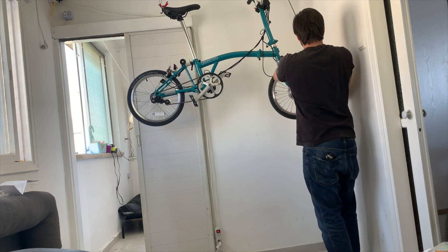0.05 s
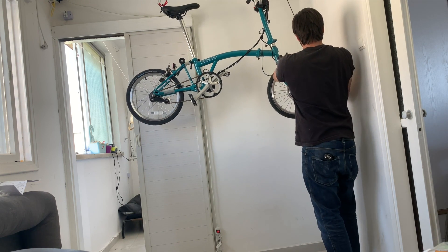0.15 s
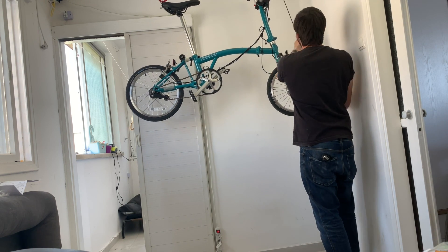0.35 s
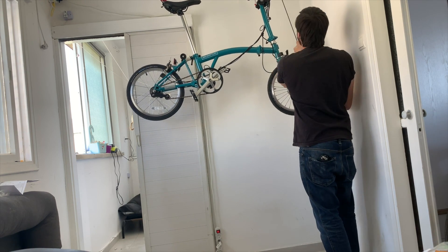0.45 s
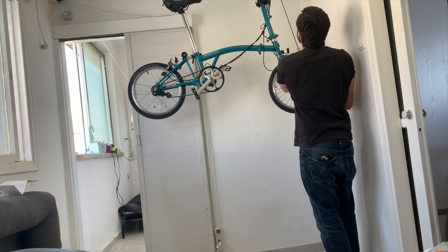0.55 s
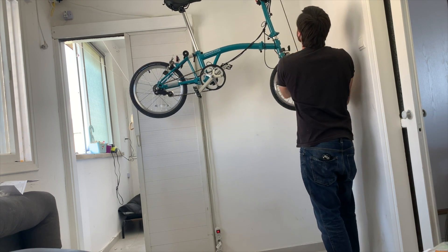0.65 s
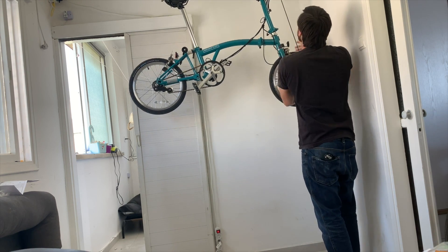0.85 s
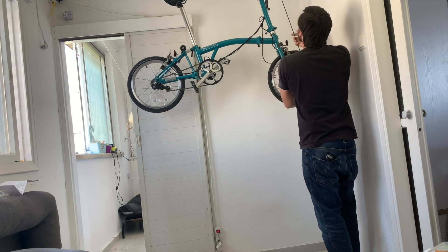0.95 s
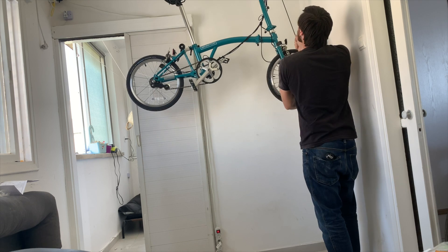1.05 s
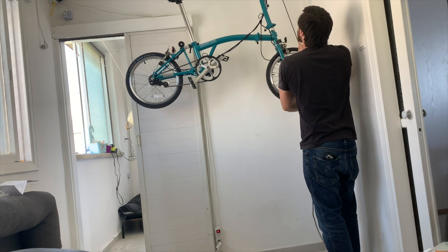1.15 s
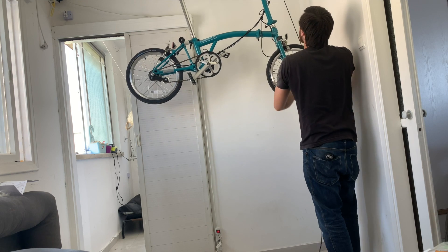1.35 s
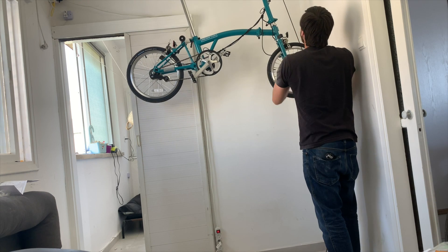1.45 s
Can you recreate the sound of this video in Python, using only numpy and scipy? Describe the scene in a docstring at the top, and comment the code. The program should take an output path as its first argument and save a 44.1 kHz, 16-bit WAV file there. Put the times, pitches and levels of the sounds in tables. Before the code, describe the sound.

A rope rustles and hisses faintly through hoist pulleys throughout, a few metres away, with small rasps and a thin pulley whine. At about 0.55 seconds the hanging bicycle gives a dull bump, then a sharp, dry click. Small metal parts tick from 0.6 to 1.4 seconds as the rustle grows slightly, with one brief squeak near 1 second. Low rumble and hum underlie the quiet room.

```python
"""A quiet room, heard in mono a few metres from a rope hoist that eases a bicycle along.
Rope fibres rustle and hiss through hands and pulleys, rasping where they catch and squeaking once.
Small metal parts tick and the sheaves sing faintly. The load gives a dull bump and a sharp click.
Underneath lie a deep rumble, a low hum and soft room air."""
import sys
import numpy as np
from scipy import signal
from scipy.fft import rfft, irfft
from scipy.io import wavfile
from scipy.ndimage import uniform_filter1d

SR = 44100
rng = np.random.default_rng(int(sys.argv[2]) if len(sys.argv) > 2 else 0)


def output_pcm(signal):
    """Save a mono or channel-first signal as 16-bit PCM at the path in sys.argv[1].

    Samples are clipped to [-1, 1] before scaling.
    """
    pcm = np.clip(np.atleast_2d(signal).T, -1, 1) * 32767
    wavfile.write(sys.argv[1], SR, np.round(pcm).astype(np.int16))


N = 66150

# fader moves of the sliding rope (time [s], rustle gain [dB], hiss gain [dB])
SLIDE_FADERS = [(0, -56, -58.5), (.09, -96, -69), (.25, -63.5, -58.5), (.29, -59.5, -56),
                (.37, -59.5, -58.5), (.46, -65, -58), (.53, -59, -58), (.57, -53.5, -50.5), (.60, -58, -61),
                (.68, -56, -56.5), (0.743, -56, -56.5), (.78, -54.5, -55), (.85, -51.5, -56),
                (.89, -55.5, -52.5), (.94, -52.5, -59.5), (.985, -53, -53), (1.04, -56.5, -59),
                (1.08, -55.5, -59), (1.11, -51, -50), (1.17, -52.5, -54), (1.24, -52.5, -55),
                (1.30, -51, -54), (1.34, -56, -61), (1.375, -55.5, -49), (1.41, -54.5, -59.5),
                (1.455, -62, -60), (1.5, -53, -57)]
# mid, bright and dull colours of rubbing fibres, each (frequency [Hz], gain [dB])
RUSTLE_EQ = [(200, -16), (900, -10), (1700, -2), (2100, -1.5), (3000, -3.5), (4300, -3), (5000, -9),
             (8000, -14), (15000, -23)]
HISS_EQ = [(2500, -20.5), (4500, -3), (6500, 2.5), (9000, -3.5), (10500, -3), (12500, -7.5), (15500, -25.5)]
HANDLING_EQ = [(50, -11), (110, 1), (170, 3.5), (210, -6.5), (280, 2), (340, -9.5), (600, -18.5),
               (2000, -41)]
# ring of the hoist, its fittings and the ticking parts, each (pitch [Hz], width [Hz], gain [dB])
HOIST_MODES = [(2016, 14, -1.5), (2330, 79, -3), (2783, 94, 5), (3034, 31, 4), (3200, 24, -2),
               (3534, 63, -2.5), (4070, 46, -6.5), (4330, 30, -5)]
FITTING_MODES = [(5994, 130, 2.5), (6870, 136, 3.5), (7410, 150, 1), (8240, 160, -2), (8900, 640, -8)]
SMALL_PART_MODES = [(7060, 180, -1.5), (7390, 300, -1.5), (8500, 810, -12)]
# catches of the rope (peak time [s], half-length [s], centre [Hz], filter width [Hz], level [dB])
CATCHES = [(0.046, 0.0028, 900, 1200, -51), (0.28, 0.0029, 1650, 1100, -51), (0.364, .01, 9500, 6060, -61),
           (0.57, .012, 8500, 7000, -60), (0.707, 0.0096, 2630, 700, -55), (0.88, 0.008, 2100, 1100, -50.5),
           (0.903, 0.028, 3130, 1300, -54), (0.993, 0.0067, 2570, 500, -47.5),
           (1.102, 0.0072, 2020, 250, -55), (1.104, .008, 5980, 350, -54), (1.108, 0.008, 3160, 300, -55.5),
           (1.131, 0.0048, 5980, 500, -57), (1.14, 0.0066, 3300, 700, -53),
           (1.156, 0.0068, 3970, 1500, -54.5), (1.16, 0.0025, 1980, 1640, -49),
           (1.166, 0.0026, 3100, 350, -53), (1.271, .01, 6000, 400, -58), (1.288, .005, 5980, 400, -55),
           (1.303, 0.0043, 3000, 400, -50), (1.365, .007, 6000, 400, -58),
           (1.381, 0.0034, 1670, 1400, -52.5), (1.487, 0.019, 3100, 500, -55.5)]
# partials of the rope's squeak (starting pitch [Hz], level [dB])
SQUEAK_PARTIALS = [(2255, -50.5), (5940, -59)]
# metal contacts (time [s], gain [dB])
TICK_CUES = [(.430, -53), (0.6137, -42.5), (0.614, -46), (0.6557, -38), (.665, -53), (0.759, -44),
             (1.014, -46), (1.060, -45.5), (1.100, -46), (1.132, -41), (1.149, -41.5), (1.172, -42.5),
             (1.199, -37.5), (1.23, -49), (1.36, -45)]
# notes of the sheaves (start [s], end [s], pitch [Hz], level [dB])
SHEAVE_NOTES = [(0.083, 0.286, 956, -61.5), (0.508, 0.525, 995, -56.5), (.6, 0.75, 1100, -66),
                (0.75, 0.917, 959, -58), (0.946, 1.043, 954, -61), (1.11, 1.24, 900, -63.5),
                (1.3, 1.45, 903, -70.5), (1.187, 1.24, 1031, -61), (0.009, 0.065, 687, -59.5),
                (0.67, 0.803, 690, -63.5)]
# jerks of the load (start [s], pitch [Hz], rise [s], decay [s], envelope peak [dB])
BUMP_CUES = [(0.536, 18.2, 0.064, 0.045, -20), (0.549, 37, 0.013, 0.025, -29.5),
             (0.551, 99, 0.0083, 0.016, -34), (0.611, 34, 0.013, 0.023, -25.5),
             (0.96, 96, 0.023, 0.042, -42.5)]
# colour of the scuff on the main bump (frequency [Hz], gain [dB])
SCUFF_EQ = [(80, 4.5), (200, 7), (600, 0), (1200, -2.5), (2500, -9.5), (8000, -53)]
# low knock and bright crack of the click (pitch [Hz], decay [s], level [dB])
CLICK_MODES = [(330, .001, -27.5), (3500, .00042, -29), (6100, .0004, -37.5)]
# low room tones (pitch [Hz], level [dB], waver [dB])
HUM_TONES = [(25.1, -43, -1), (55.05, -46, 3)]
# colour of the room air (frequency [Hz], gain [dB])
AIR_EQ = [(8, 11.5), (20, 8.5), (40, 2), (70, 1), (100, -4), (180, -12.5), (290, -13.5), (400, -19),
          (680, -15), (800, -21), (1000, -16), (1500, -27), (2400, -22.5), (3600, -35), (8000, -35),
          (15000, -49.5)]


def rope(t):
    """Sliding fibres rustle, hiss and set the hoist and its fittings ringing."""
    times, rustle_db, hiss_db = np.array(SLIDE_FADERS).T
    rustle = undb(-2.5) * unit(colour(grains(), RUSTLE_EQ))
    hoist = undb(-7) * stir(HOIST_MODES)
    handling = undb(-7.5) * unit(colour(grains(), HANDLING_EQ))
    hiss = undb(-4) * unit(colour(grains(), HISS_EQ))
    fittings = undb(-4.5) * stir(FITTING_MODES)
    body = undb(np.interp(t, times, rustle_db)) * (rustle + hoist + handling)
    sheen = undb(np.interp(t, times, hiss_db)) * (hiss + fittings)
    return body + sheen


def grains(slips_per_s=6500, spread_db=3, flutter_db=1.9):
    """Dense tiny slips of fibres, uneven in size and coming in flurries."""
    slips = (rng.random(N) < slips_per_s / SR) * np.sign(noise())
    size_db = spread_db * np.minimum(rng.exponential(size=N), 6)
    return slips * undb(size_db + flutter_db * walk(60.03))


def stir(modes, swell_db=2.5):
    """The rope excites resonances that each swell and fade as the contact shifts."""
    slips = grains()
    return unit(sum(undb(db) * resonate(slips * undb(swell_db * walk(25)), hz, width)
                    for hz, width, db in modes))


def rasps(t):
    """Short bursts of fibre grain where the rope catches."""
    out = 0
    for peak, half_length, hz, width, db in CATCHES:
        rasp = unit(resonate(resonate(grains(), hz, width), hz, width))
        out += undb(db) * bell(t, peak, half_length) * rasp
    return out


def squeak(t, start=.944, end=1.001, attack_s=.022, release_s=.009):
    """The rope sticks and slips in one short rough squeak that rises as it tightens."""
    age = t - start
    gate = np.clip(np.minimum(age / attack_s, (end - t) / release_s), 0, 1)
    bend = 1 + .49 * age + .0076 * walk(600)  # pitch ratio: a climb with a rough edge
    tone = sum(undb(db + 4 * walk(196.8)) * np.sin(2 * np.pi * hz * np.cumsum(bend) / SR)
               for hz, db in SQUEAK_PARTIALS)
    return np.sqrt(2) * gate * tone


def ticks(t, decay_s=.0058):
    """Small metal parts chatter briefly, each contact a ring with a crisp edge."""
    envelope = sum(undb(db) * (t >= start) * np.exp(-np.abs(t - start) / decay_s)
                   for start, db in TICK_CUES)
    chatter = np.sign(noise())
    ringing = ring(envelope * chatter, SMALL_PART_MODES) / np.std(ring(chatter, SMALL_PART_MODES))
    crack = undb(-13.5) * envelope * unit(colour(noise(), HISS_EQ))
    return undb(-6) * (ringing + crack)


def bumps(t):
    """Soft low swings as the load jerks, with a scuff on the main one."""
    scuff = undb(-47.5) * bell(t, peak=.571, half_length=.028) * unit(colour(noise(), SCUFF_EQ))
    thuds = 0
    for start, hz, rise, decay, db in BUMP_CUES:
        age = np.maximum(t - start, 0)
        swell = (1 - np.exp(-(age / rise) ** 2)) * np.exp(-age / decay)
        thuds -= undb(db) * swell / swell.max() * np.sin(2 * np.pi * hz * age)
    return scuff + thuds


def click(t, start=.5858):
    """One hard, dry snap with a short knock as the load settles."""
    age = np.maximum(t - start, 0)
    return sum(undb(db) * np.exp(-age / decay) * np.sin(2 * np.pi * hz * age)
               for hz, decay, db in CLICK_MODES)


def sheaves(t, pitch_waver=.0018, waver_db=.71):
    """The turning pulleys sing faint, wavering notes."""
    out = 0
    for start, end, hz, db in SHEAVE_NOTES:
        gate = fade(t, start, end, fade_s=.029)
        phase = 2 * np.pi * np.cumsum(hz * (1 + pitch_waver * walk(49.6))) / SR
        out += np.sqrt(2) * undb(db + waver_db * walk(31.3)) * gate * np.sin(phase)
    return out


def rumble(t, hz=23.16):
    """A deep, narrow band of noise comes up while the load moves."""
    moving = fade(t, start=.29, end=1.28, fade_s=.018)
    return undb(-41) * moving * unit(resonate(resonate(noise(), hz, width=12.4), hz, width=7.9))


def room_tone(t):
    """A bed of gently wavering hum and dark air."""
    hum = sum(undb(db + waver * walk(4.7)) * np.sin(2 * np.pi * hz * t + .72 * walk(5.82))
              for hz, db, waver in HUM_TONES)
    air = undb(-43.5) * unit(colour(noise(), AIR_EQ))
    return np.sqrt(2) * hum + air


def reverb(x, t, t60_s=.4, predelay_s=.004, wet_db=-8.5):
    """Bare walls add a short tail of reflections."""
    tail = noise() * (t > predelay_s) * undb(-60 * t / t60_s)
    return x + undb(wet_db) * signal.fftconvolve(x, tail / np.linalg.norm(tail))[:N]


def undb(db):
    """Decibels to gain."""
    return 10 ** (np.asarray(db) / 20)


def unit(x):
    """Scale to rms 1."""
    return x / np.sqrt(np.mean(x ** 2))


def noise():
    """White noise."""
    return rng.standard_normal(N)


def walk(steps_per_s):
    """Smooth random drift with a spread near 1."""
    hold = int(SR / steps_per_s)
    steps = np.repeat(noise()[:N // hold + 1], hold)
    return 1.3 * uniform_filter1d(uniform_filter1d(steps, hold), hold)[:N]


def bell(t, peak, half_length):
    """A Gaussian swell."""
    return np.exp(-.5 * ((t - peak) / half_length) ** 2)


def fade(t, start, end, fade_s):
    """A gate with straight fades centred on its start and end."""
    return np.clip(np.minimum(t - start, end - t) / fade_s + .5, 0, 1)


def colour(x, points):
    """Minimum-phase EQ through (frequency [Hz], gain [dB]) points."""
    hz, db = np.array(points, float).T
    bins_hz = np.maximum(np.fft.rfftfreq(2 * N, 1 / SR), 1)
    curve_db = np.interp(np.log(bins_hz), np.log(hz), db)
    cepstrum = irfft(np.log(undb(curve_db)))
    cepstrum[1:N] *= 2  # folded forward, so nothing rings ahead of an attack
    cepstrum[N + 1:] = 0
    return irfft(rfft(x, 2 * N) * np.exp(rfft(cepstrum)))[:N]


def resonate(x, hz, width):
    """One resonance, gain 1 at its centre."""
    return signal.lfilter(*signal.iirpeak(hz, hz / width, fs=SR), x)


def ring(x, modes):
    """A set of resonances driven together."""
    return sum(undb(db) * resonate(x, hz, width) for hz, width, db in modes)


def scene():
    """Rope, rasps and ticks feed the reverb, the rest stays dry; all sits dead centre."""
    t = np.arange(N) / SR
    wet = reverb(rope(t) + rasps(t) + ticks(t), t)
    mono = wet + squeak(t) + sheaves(t) + bumps(t) + click(t) + rumble(t) + room_tone(t)
    return np.array([mono, mono])


def record(dry, top_hz=15650):
    """A steep low-pass takes off the very top."""
    return signal.sosfilt(signal.ellip(10, .1, 90, top_hz, fs=SR, output="sos"), dry)


dry = scene()
out = record(dry)
output_pcm(out)
```